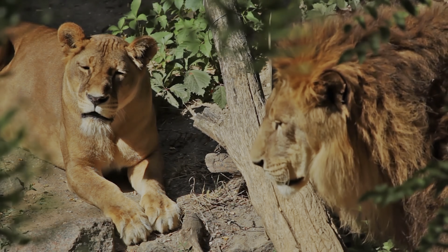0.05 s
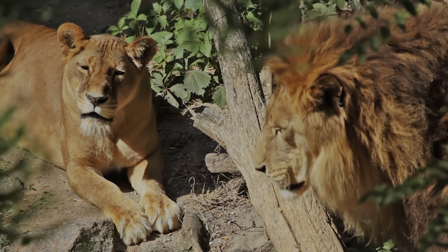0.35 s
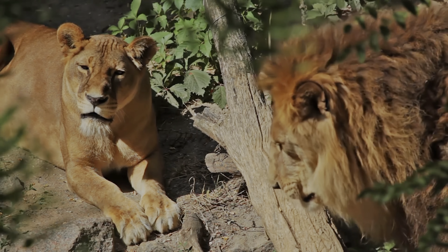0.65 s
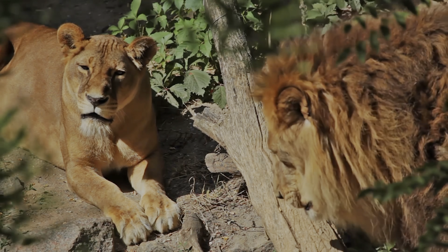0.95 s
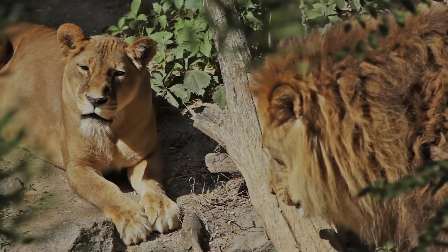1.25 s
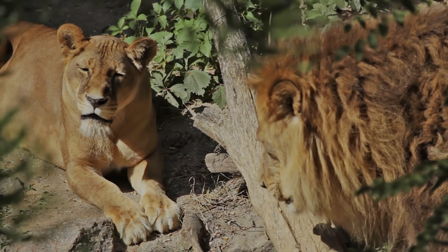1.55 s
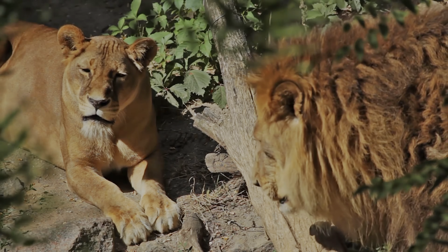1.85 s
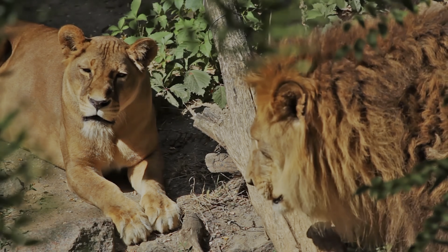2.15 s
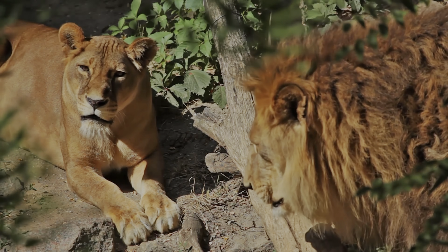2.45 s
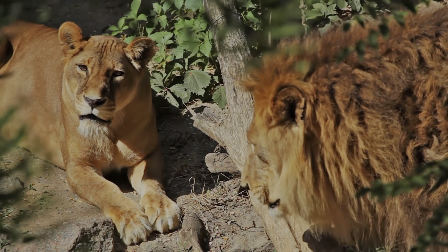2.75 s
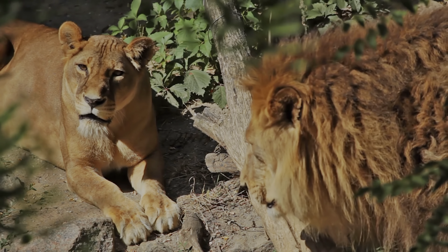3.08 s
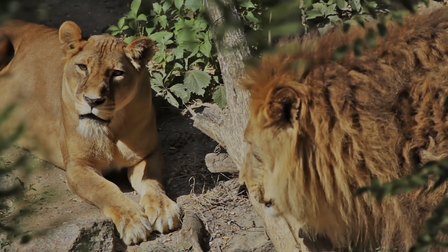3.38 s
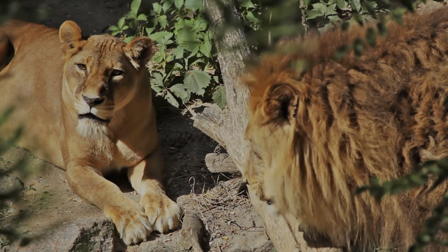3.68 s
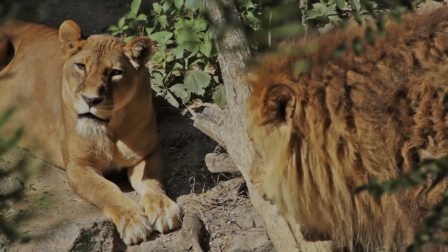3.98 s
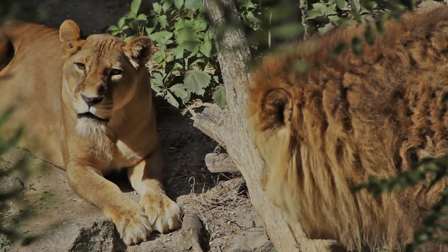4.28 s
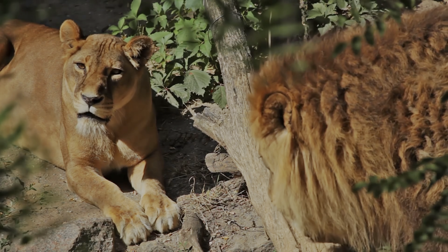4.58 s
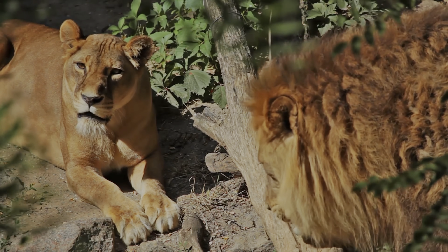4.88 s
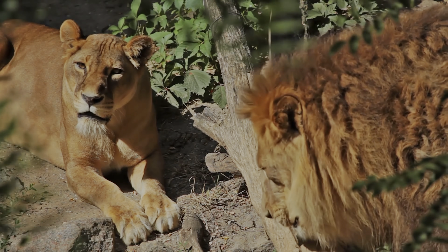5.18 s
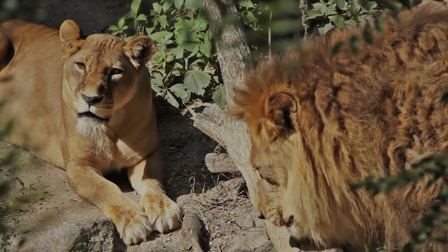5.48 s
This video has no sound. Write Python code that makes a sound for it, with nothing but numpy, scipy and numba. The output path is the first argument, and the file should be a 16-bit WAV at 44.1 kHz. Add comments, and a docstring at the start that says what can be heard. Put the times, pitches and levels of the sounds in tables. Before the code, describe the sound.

A lion gives five deep, hoarse roars, each falling in pitch, with a low throaty rattle before the last.

```python
"""Rocky enclosure, open air, one microphone: a lion roars five times, with echoes from near and far.
Its vocal folds drive throat and mouth: each roar swells as a hollow moan, sinks in pitch and breaks
up into a hoarse, open-mouthed rasp. Before the last one the slack folds flap in slow, separate pulses,
then creak back into voice. Faint air lies behind. The narrow-band recorder adds a few sharp, dry
digital clicks, and there is one soft, full-band click, like an edit splice."""
import sys
import numpy as np
from scipy import signal
from scipy.fft import rfft, irfft
from scipy.io import wavfile
from scipy.ndimage import uniform_filter1d
from numba import njit

SR = 44100
rng = np.random.default_rng(int(sys.argv[2]) if len(sys.argv) > 2 else 0)


def digitize_waveform(pressure):
    """Quantize a signal to 16-bit integers and store it at the path in sys.argv[1].

    Rows of a 2-D input are taken as channels; values are limited to [-1, 1].
    """
    field = np.atleast_2d(pressure).T
    bounded = np.clip(field, -1, 1)
    quanta = np.round(bounded * 32767).astype(np.int16)
    wavfile.write(sys.argv[1], SR, quanta)


N = 252693
TIME = np.arange(N) / SR

# Six calls: five roars and, before the last, a faint murmur. Table levels are relative throughout.
# One list a call: t/s, pitch/Hz, effort/dB, mouth opening/0-1, roughness/0-1
CALLS = [
    [(0, 156.4, -18.5, 0.54, .45), (.11, 146.9, -26.5, 0.75, 0.83), (.14, 151.5, -19.5, 0.89, 0.58),
     (.21, 160.2, -21, 0.8, 0.57), (.25, 146.6, -28, 0.99, 0.87), (.29, 138, -25.5, 0.84, 0.83),
     (.325, 148.4, -34.5, 1, 0.78), (.345, 163.6, -27.5, 0.97, 0.88), (.39, 197.5, -33, 0.87, 0.61)],
    [(.41, 212.5, -33, 0.4, 0.46), (.49, 240.2, -38, 0, 0.19), (.65, 191.3, -38, 0, 0.16),
     (.78, 187, -33.5, 0.06, .14), (.84, 227.4, -24.5, 0.15, 0.24), (.92, 213.5, -18.5, 0.24, 0.09),
     (1.04, 160, -24, 0.68, 0.2), (1.13, 152.1, -22, 0.44, 0.23), (1.22, 147, -21, 0.36, 0.39),
     (1.33, 128.5, -23, 0.72, 0.79), (1.41, 104.3, -27, 0.31, 0.79), (1.46, 105.6, -37.5, 0.33, 0.69),
     (1.52, 104.6, -42, 0.47, 0.52)],
    [(1.55, 135.1, -44.5, .4, 0.5), (1.63, 145.9, -39.5, 0.5, 0.51), (1.73, 187.9, -28.5, 0.17, 0.49),
     (1.84, 231.3, -25, 0.02, .52), (2.02, 210.7, -25.5, 0.05, .65), (2.14, 159.3, -22, 0.33, 0.57),
     (2.26, 144.2, -20.5, 0.53, .65), (2.37, 175, -18.5, 0.62, 0.71), (2.47, 186, -18.5, .8, 0.66),
     (2.56, 171.2, -16.5, 0.98, 0.67), (2.74, 151, -22, 1, 0.86), (2.81, 140, -45, .6, 0.81),
     (2.88, 145.5, -49, 0.78, 0.71)],
    [(2.98, 150, -58.5, 0.01, .2), (3.13, 178.7, -55.5, 0, 0.17), (3.21, 283, -38, 0.12, .28),
     (3.32, 256.7, -37, 0.01, .42), (3.41, 224.3, -28.5, 0.31, 0.55), (3.57, 175.4, -26.5, 0.49, 0.25),
     (3.67, 167.2, -32.5, 0.72, 0.71), (3.77, 157.3, -37, 0.53, 0.67), (3.85, 150, -49, 0.88, 1)],
    [(4.39, 185.4, -66.5, 0.04, 0.65), (4.44, 187.4, -57, 0.08, .75), (4.55, 139.4, -81, .1, 0.68)],
    [(4.82, 225, -53, .3, .4), (4.86, 222.3, -39, 0, 0.4), (5.01, 202.9, -34, 0.33, .4),
     (5.12, 164.4, -32.5, 0.43, .4), (5.25, 147, -29, .7, .25), (5.37, 140.2, -31, 0.48, 0.73),
     (5.5, 118.5, -30, 0.56, 0.86), (5.53, 113, -29, 0.4, 0.9), (5.65, 101.3, -36, 0.41, .9),
     (5.73, 97.14, -51, 0.78, .9)],
]
# timbre of each call: throat f/Hz, first jaw f/Hz, last jaw f/Hz, rasp level/dB, hiss level/dB
CALL_TIMBRES = [(407, 1080, 870, -9.5, 7.5), (411, 650, 1150, 1, 4.5), (438.1, 1119, 900.5, -3, -1.5),
                (378.1, 900, 1106, -4, -3.5), (364, 670, 670, -9, -5), (432.9, 947, 1107, -4, 0)]
# the chest tone swells and sinks with the depth of the folds' swing: start/s, end/s, gain/dB
CHEST_SWELLS = [(0.391, 0.576, 8), (0.989, 1.248, 14), (1.649, 2.248, 10.5), (2.298, 2.46, -7.5),
                (2.998, 3.16, -13), (3.177, 3.483, 9.5), (3.527, 3.64, 13.5), (5.074, 5.334, 13)]
# tract resonances, mouth nearly shut and wide open: f/Hz, width/Hz, level/dB
SHUT_FORMANTS = [(606, 37.5, 13), (1050, 230, -12), (1606, 53, -12.5), (2130, 270, -28), (2320, 21, -10),
                 (3680, 350, -27), (4800, 350, -36)]
OPEN_FORMANTS = [(604, 68, 1.5), (885, 190, -1), (1050, 250, -7.5), (1393, 200, -12.5), (1940, 590, -15.5),
                 (2316, 220, -11), (2650, 970, -21), (3359, 170, -14), (3660, 550, -18), (4800, 2300, -33)]
# resonances of a clear, falling vowel: f/Hz, width/Hz, level/dB
VOWEL_FORMANTS = [(1783, 120, -6), (2640, 150, -7.5)]
# when that vowel is clearest in each call (too early to be heard in the first): t/s
VOWEL_PEAKS = [(-.5,), (.87,), (1.77,), (3.12,), (4.4,), (5.02,)]
# the throat is tight as a roar sets in: start/s, end/s, level/dB
TIGHT_ONSETS = [(.48, 0.611, -31), (1.576, 1.686, -34), (3.135, 3.241, -35.5), (4.579, 4.839, -51.5)]
# falling tones in the voice: start/s, end/s, first f/Hz, last f/Hz, level/dB
FALLING_TONES = [(0.127, 0.252, 1020, 930, -21), (0.725, 0.929, 2870, 2504, -49.5),
                 (0.943, 1.045, 425.5, 397, -18), (1.123, 1.32, 387.8, 337.5, -12.5),
                 (1.954, 2.145, 285.9, 208.7, -16.5), (2.275, 2.383, 985, 955, -23.5),
                 (2.46, 2.68, 1004, 903, -18), (3.315, 3.45, 214, 132.9, -24),
                 (3.471, 3.641, 441.7, 340.2, -24), (5.045, 5.119, 1927, 1790, -63.5),
                 (5.098, 5.22, 306.6, 202.7, -19.5), (5.2, 5.308, 1088, 988, -34)]
# strength along the run of flaps: t/s, level/dB
FLAP_LEVELS = [(3.86, -20), (3.91, -28.5), (4.24, -30.5), (4.38, -39)]
# creaks as the folds tighten again: t/s, level/dB
CREAK_PULSES = [(4.582, -34.5), (4.603, -27), (4.624, -35.5), (4.642, -31.5), (4.679, -34.5), (4.698, -26),
                (4.744, -26.5), (4.779, -25), (4.804, -27), (4.831, -18)]
# throat modes rung by the flaps and by the creaks: f/Hz, level/dB, t60/s
FLAP_RING = [(115.9, -16, 0.48), (194, -5, 0.12), (326.3, 3, 0.12), (640, -33, 0.033), (959.7, -6, 0.068),
             (1099.4, -1.5, 0.085), (1360, -11.5, .045), (1708, -11, 0.026), (2047, -7, 0.032),
             (2822, -3, 0.0198)]
CREAK_RING = [(95, -21, 0.19), (306, -17.5, 0.17), (551.7, 5, 0.03), (621.4, 4.5, 0.037), (980, -13, 0.016),
              (1636, -18, 0.0039), (3100, -27.5, 0.013)]
# the recorder's digital clicks: t/s, level/dB
DIGITAL_CLICKS = [(1.8676, -5), (4.4375, -44), (5.1805, -26.5)]
# spectrum of the outdoor air: f/Hz, level/dB
AIR_SPECTRUM = [(41, -37.5), (70, -19), (175, -7.5), (245, -3), (299, 3.5), (476, -24), (669, -20),
                (1070, -19.5), (1390, -29.5), (5060, -31), (6580, -66.5), (11100, -120)]
# parts of the voice against the effort: level/dB, gain wide open/dB, gain at full roughness/dB
CHEST, THROAT, MOUTH = (-2.3, -2.5, 3.8), (12.75, -21.5, 0), (-3.38, 0, 0)
RASP, HISS = (-29.5, -1, 14), (-34.5, 1, 3.82)


def roars(flutter_db=5.5, chest_waver_db=1.5, throat_waver_db=3.5):
    """The folds drive chest, throat, mouth, rasp and hiss, all following the effort, and a tight ring."""
    pitch_hz, effort_db, opening, rough = in_time(np.vstack(CALLS))
    opening, rough = np.clip([opening, rough], 0, 1)
    throat_hz, _, _, rasp_db, hiss_db = per_call(CALL_TIMBRES)
    swell_db = sum(db * window(start, end, fade_s=.04) for start, end, db in CHEST_SWELLS)
    relative_pitch = pitch_hz / np.mean(pitch_hz)

    def level(part, extra_db=0):
        """Gain of one part of the voice."""
        base_db, open_db, rough_db = part
        return from_db(effort_db + base_db + open_db * opening + rough_db * rough + extra_db)

    phase, pulses, turbulence = vocal_folds(pitch_hz, rough)
    # the heavy folds close softly, so turbulence takes over in the treble
    source = cut(pulses, 1200, "low", order=1) + turbulence
    chest = chest_tone(phase, turbulence, rough)
    chest *= level(CHEST, swell_db + chest_waver_db * drift(14))
    # the larynx is drawn down as the pitch sinks: a longer tract lowers the throat and the shut mouth
    throat = throat_moan(source, throat_hz * relative_pitch ** .14)
    throat *= level(THROAT, throat_waver_db * drift(38))
    tract = vocal_tract(source, opening, shortness=relative_pitch ** .25)
    mouth = level(MOUTH) * even(cut(tract + jaw(source, opening), [585, 1550], "band", order=4))
    rasp = level(RASP, rasp_db) * even(cut(tract, [1550, 3200], "band", order=5))
    hiss = level(HISS, hiss_db) * even(cut(tract, 3210, "high", order=5))
    flutter = from_db(flutter_db * rough * drift(81))
    voiced = sum(window(call[0][0] - .01, call[-1][0] + .0054, fade_s=.018) for call in CALLS)
    return voiced * (chest + throat + (mouth + rasp + hiss) * flutter) + tight_throat(source)


def vocal_folds(pitch_hz, rough, jitter=.085, tremor=.008, shimmer=.39, leak=.18):
    """Phase of the folds, their uneven closures, and the turbulent air that each cycle lets through."""
    phase = np.cumsum(pitch_hz * (1 + jitter * rough * drift(70) + tremor * drift(25))) / SR
    closures = np.flatnonzero(np.diff(np.floor(phase)) > 0)
    pulses = np.zeros(N)
    pulses[closures] = np.exp(shimmer * rough[closures] * rng.standard_normal(N)[closures])
    puffs = rng.standard_normal(N) * np.exp(.19 * np.cos(2 * np.pi * phase))
    return phase, even(pulses), (leak + rough) * even(puffs)


def chest_tone(phase, turbulence, rough, rumble_db=-38.5):
    """Uneven swings of the folds spread the deep fundamental into a growl, over a faint rumble."""
    growl = .51 * rough * even(cut(turbulence, [155, 320], "band", order=3))
    return even(np.sin(2 * np.pi * phase) + growl) + from_db(rumble_db) * drift(130)


def throat_moan(source, centre_hz, width_hz=135):
    """One gliding throat resonance makes the hollow moan."""
    ring = resonance(resonance(source, centre_hz, width_hz), centre_hz, width_hz)
    return even(cut(ring, 224.5, "high", order=6))


def vocal_tract(source, opening, shortness, vowel_span_s=.16, fall_octaves_per_s=.8):
    """The opening mouth blends shut into open resonances; a vowel rings out briefly and slides down."""
    shut = formants(source, SHUT_FORMANTS, shortness)
    wide = formants(source, OPEN_FORMANTS, np.ones(N))
    since_peak_s = TIME - per_call(VOWEL_PEAKS)[0]
    vowel = formants(source, VOWEL_FORMANTS, 2 ** (-fall_octaves_per_s * since_peak_s))
    clarity = np.exp(-(since_peak_s / vowel_span_s) ** 2)
    return (1 - opening) * shut + opening * wide + clarity * vowel


def jaw(source, opening, shut_db=-8, opening_gain_db=13):
    """A resonance that glides through the call and gains weight as the jaw opens."""
    path = []
    for call, (_, first_hz, last_hz, _, _) in zip(CALLS, CALL_TIMBRES):
        path += [(call[0][0], first_hz), (call[-1][0], last_hz)]
    centre_hz, = in_time(path)
    return from_db(shut_db + opening_gain_db * opening) * resonance(source, centre_hz, width_hz=55)


def tight_throat(source, centre_hz=630, width_hz=115):
    """The thin, high ring of a tight throat as a roar sets in."""
    centre = np.full(N, centre_hz)
    ring = even(resonance(resonance(source, centre, width_hz), centre, width_hz))
    return ring * sum(from_db(db) * window(start, end, fade_s=.02) for start, end, db in TIGHT_ONSETS)


def falling_tones(waver=.015):
    """Wavering, falling tones: low second pitches and higher ringing overtones of the mouth."""
    tones = np.zeros(N)
    wander = 1 + waver * drift(60)
    for start, end, first_hz, last_hz, db in FALLING_TONES:
        hz = np.interp(TIME, [start, end], [first_hz, last_hz]) * wander
        tones += from_db(db) * window(start, end, fade_s=.15) * np.sin(2 * np.pi * np.cumsum(hz) / SR)
    return tones


def flaps(count=13, start_s=3.863, first_gap_s=.0407, slowing_s=.0004):
    """The slack folds flap in a dull run, each gap a little longer than the last."""
    k = np.arange(count)
    times = start_s + first_gap_s * k + slowing_s * k * (k - 1) / 2
    levels_db = np.interp(times, *np.transpose(FLAP_LEVELS))
    knocks = impulses(np.transpose([times, levels_db]), gain_db=-10.5)
    return cut(ring_throat(knocks, FLAP_RING, breath=.98, breath_s=.017), 1610, "low", order=4)


def creaks():
    """The folds tighten again and creak back into voice."""
    return ring_throat(impulses(CREAK_PULSES, gain_db=-9.5), CREAK_RING, breath=.72, breath_s=.0045)


def ring_throat(knocks, modes, breath, breath_s):
    """Each knock of the folds lets out a short flurry of air; both ring the throat's modes."""
    decay = signal.lfilter([1], [1, -np.exp(-1 / (breath_s * SR))], knocks)
    drive = knocks + breath * decay * rng.standard_normal(N) / np.sqrt(breath_s * SR)
    ringing = np.zeros(N)
    for k, (hz, db, t60_s) in enumerate(modes):
        radius, turn = from_db(-60 / (t60_s * SR)), 2 * np.pi * hz / SR
        mode = signal.lfilter([0, np.sin(turn)], [1, -2 * radius * np.cos(turn), radius ** 2], drive)
        ringing += (-1) ** k * from_db(db) * mode
    return ringing


def enclosure(x, t60_s, dull_hz, delay_s=.0042):
    """Rocks and plants scatter a dull tail back to the microphone."""
    t = TIME[:SR]
    tail = rng.standard_normal(SR) * from_db(-60 * t / t60_s) * (t > delay_s)
    tail = cut(tail / np.linalg.norm(tail), [280, dull_hz], "band", order=1)
    return signal.fftconvolve(x, tail)[:N]


def digital_clicks():
    """A few sharp, dry digital clicks from the recorder."""
    return cut(impulses(DIGITAL_CLICKS, gain_db=14), 400, "high", order=1)


def splice_click(at_s=2.9507):
    """One soft, full-band click, like an edit splice."""
    return cut(impulses([(at_s, 0)], gain_db=-5), 700, "low", order=1)


def air(level_db=-55.5):
    """Faint, steady outdoor noise at the microphone."""
    hz, db = np.transpose(AIR_SPECTRUM)
    bins_hz = np.arange(N // 2 + 1) * SR / N
    gain = from_db(np.interp(np.log(bins_hz + 1), np.log(hz), db))
    return from_db(level_db) * unit_power(irfft(rfft(rng.standard_normal(N)) * gain, N))


def formants(x, table, shortness):
    """Parallel resonances of alternating sign, all raised as the tract shortens."""
    return sum((-1) ** k * from_db(db) * resonance(x, hz * shortness, width_hz)
               for k, (hz, width_hz, db) in enumerate(table))


@njit
def resonance(x, centre_hz, width_hz):
    """A resonance of gain one whose centre follows a curve."""
    turn, radius = 2 * np.pi * centre_hz / SR, np.exp(-np.pi * width_hz / SR)
    out, state = np.zeros(len(x)), 0j
    for i in range(len(x)):
        state = state * radius * np.exp(1j * turn[i]) + (1 - radius) * x[i]
        out[i] = 2 * state.real
    return out


def impulses(events, gain_db):
    """One single-sample spike for each row of t/s, level/dB."""
    times, levels_db = np.transpose(events)
    spikes = np.zeros(N)
    spikes[np.round(times * SR).astype(int)] = from_db(levels_db + gain_db)
    return spikes + 1e-18


def per_call(rows, blend_s=.037):
    """Each column held from one call's start to the next, with a short blend."""
    which = np.searchsorted([call[0][0] for call in CALLS[1:]], TIME)
    return uniform_filter1d(np.array(rows, float)[which].T, int(blend_s * SR))


def in_time(rows):
    """Each column of a curve, sample by sample."""
    times, *columns = np.transpose(rows)
    return [np.interp(TIME, times, column) for column in columns]


def window(start, end, fade_s):
    """A gate between two times, with straight fades centred on them."""
    return np.clip(np.minimum(TIME - start, end - TIME) / fade_s + .5, 0, 1)


def drift(rate_hz):
    """Random wander of spread 1, up to the given rate."""
    return unit_power(cut(rng.standard_normal(N + SR), rate_hz, "low")[SR:])


def even(x, span_s=.033):
    """Hold the running power at one, leaving the fast flutter."""
    size = int(span_s * SR / 2)
    power = uniform_filter1d(uniform_filter1d(x * x, size), size)
    return x / np.sqrt(np.abs(power) + 1e-12)


def cut(x, hz, kind, order=2):
    """Butterworth filter."""
    return signal.sosfilt(signal.butter(order, hz, kind, fs=SR, output="sos"), x)


def unit_power(x):
    """Scale to a mean square of one."""
    return x / np.sqrt(np.mean(x ** 2) + 1e-20)


def from_db(db):
    """Decibels to gain."""
    return 10 ** (np.asarray(db) / 20)


def scene():
    """The lion direct, its echoes from near and far, and the air, plus the recorder's digital clicks."""
    slack_folds = flaps() + creaks()
    voice = roars() + falling_tones()
    lion = voice + slack_folds
    near = from_db(-1) * enclosure(voice, t60_s=.17, dull_hz=4540)
    far = from_db(-21) * enclosure(lion, t60_s=1, dull_hz=1500)
    return (lion + near + far + digital_clicks() + air())[None]


def record(dry, ceiling=.92, rate_hz=11025, band_edge_hz=5400, image_db=-52, offset=.0346):
    """Peaks round off; a low rate narrows the band and leaves a faint image; the splice click follows."""
    rounded = dry / (1 + (dry / ceiling) ** 8) ** (1 / 8)
    band_limit = signal.ellip(10, .2, 70, band_edge_hz, fs=SR, output="sos")
    narrow = signal.sosfilt(band_limit, rounded) + offset  # the converter sits off zero
    mirrored = narrow * (1 + from_db(image_db) * np.cos(2 * np.pi * rate_hz * TIME))
    return cut(mirrored + splice_click(), 13000, "low", order=12)


dry = scene()
out = record(dry)
digitize_waveform(out)
```